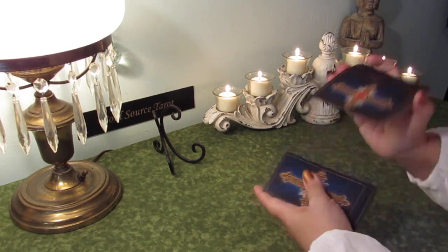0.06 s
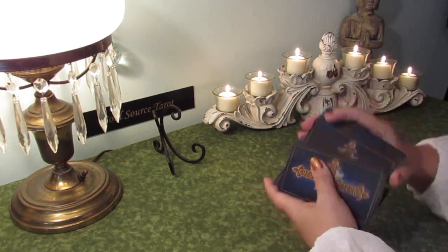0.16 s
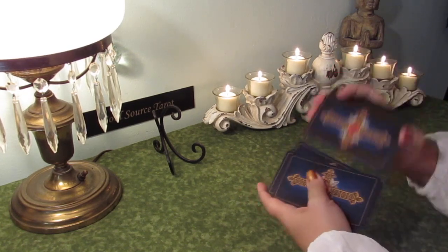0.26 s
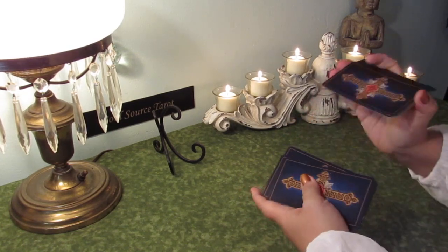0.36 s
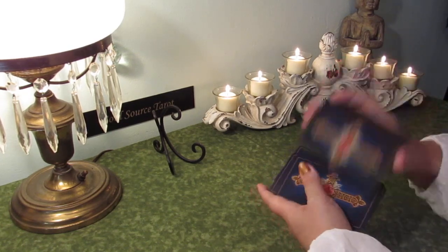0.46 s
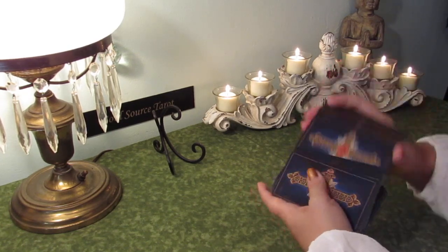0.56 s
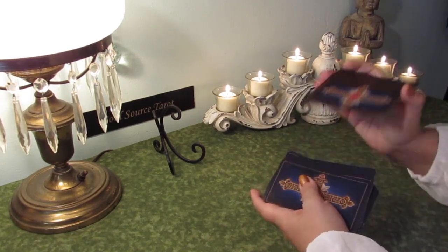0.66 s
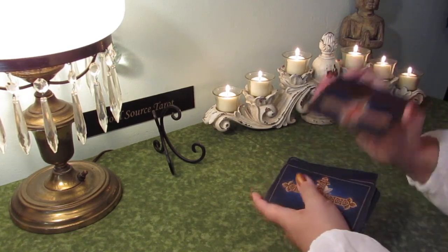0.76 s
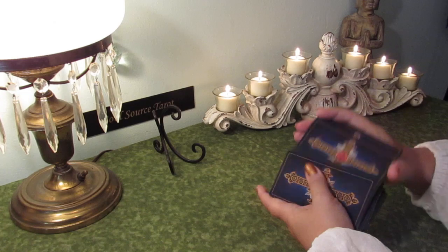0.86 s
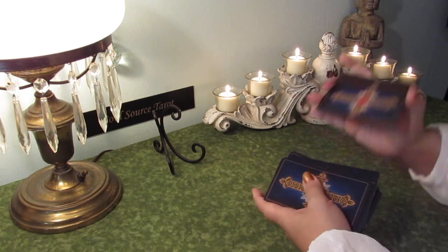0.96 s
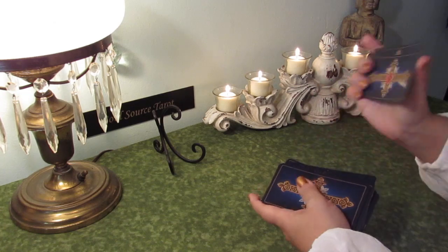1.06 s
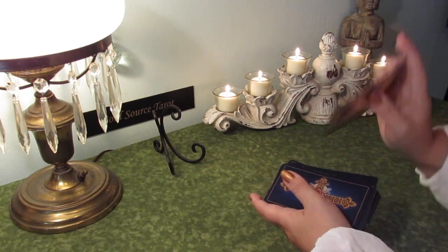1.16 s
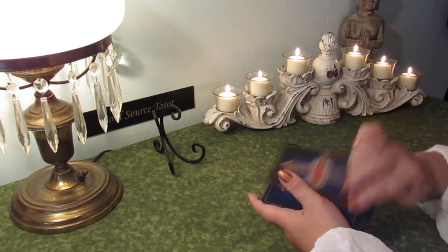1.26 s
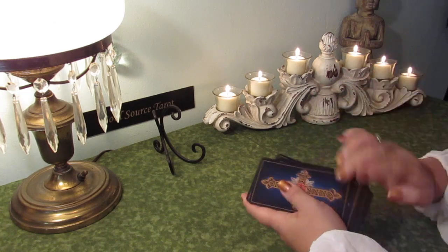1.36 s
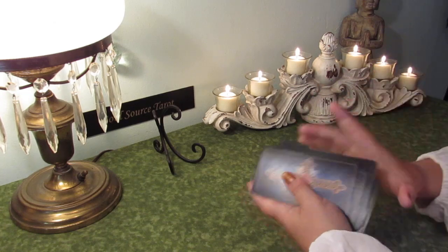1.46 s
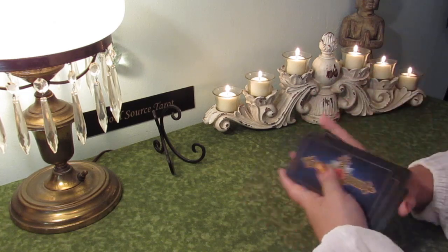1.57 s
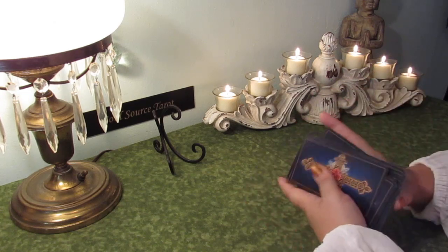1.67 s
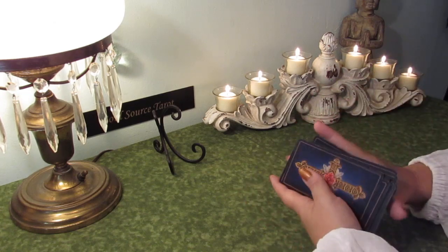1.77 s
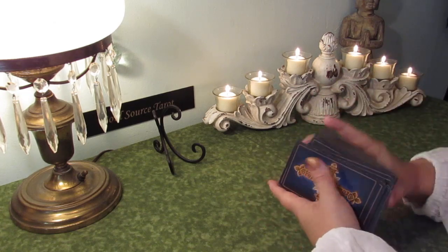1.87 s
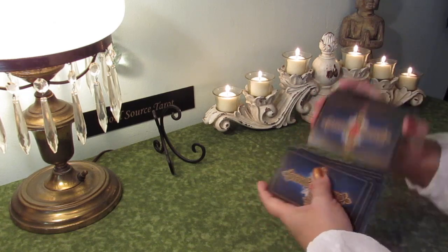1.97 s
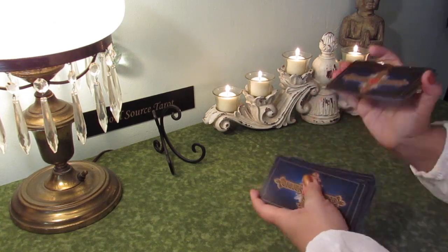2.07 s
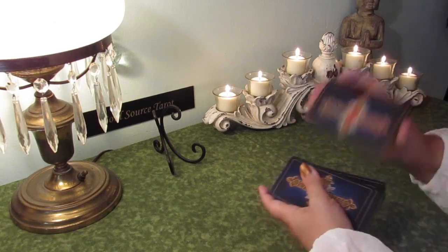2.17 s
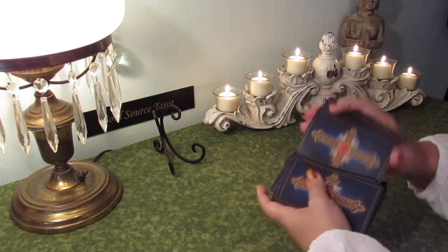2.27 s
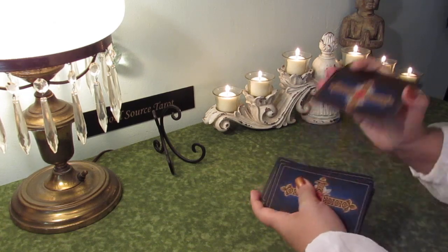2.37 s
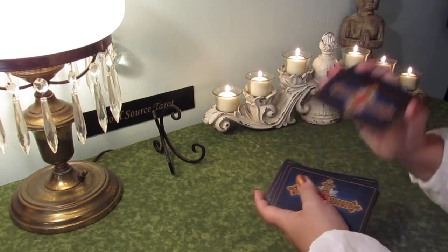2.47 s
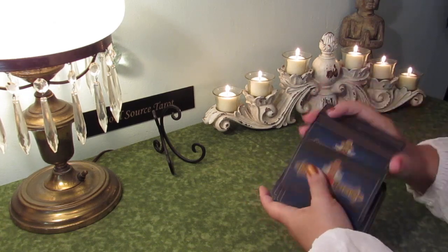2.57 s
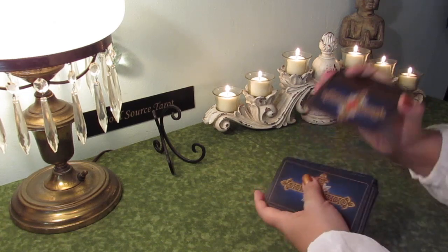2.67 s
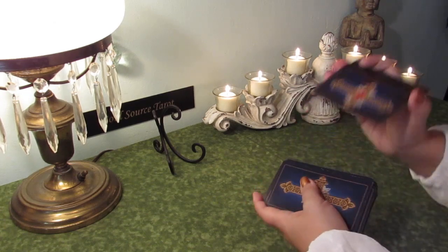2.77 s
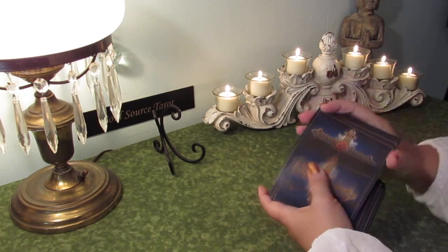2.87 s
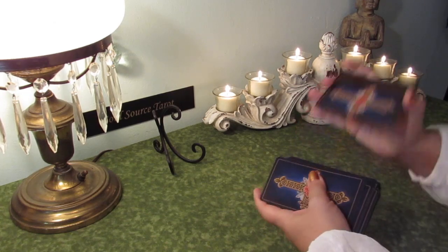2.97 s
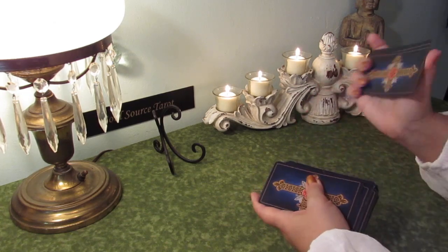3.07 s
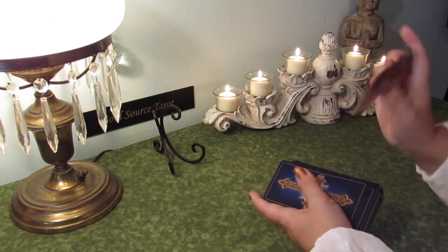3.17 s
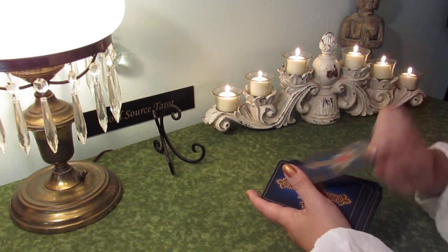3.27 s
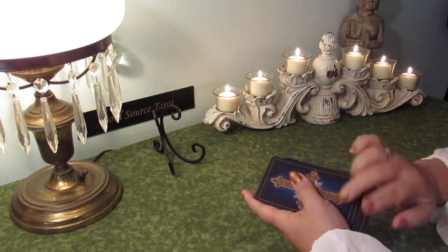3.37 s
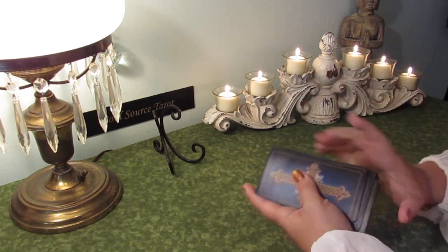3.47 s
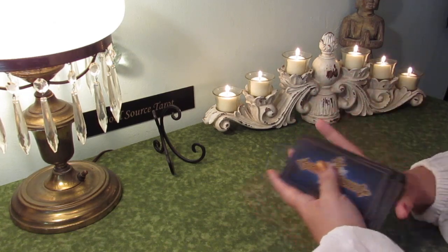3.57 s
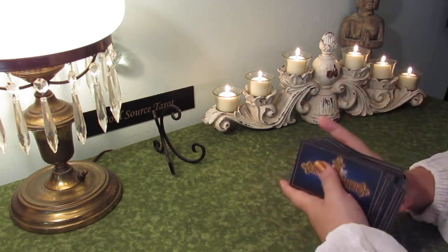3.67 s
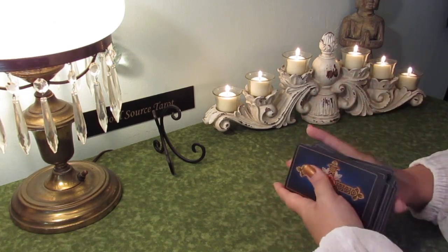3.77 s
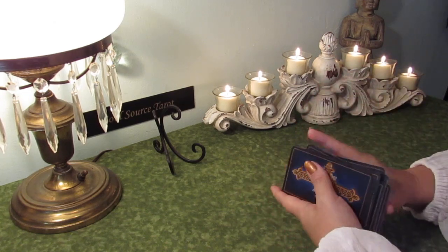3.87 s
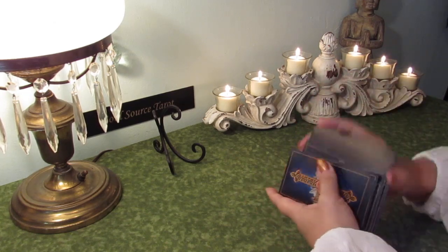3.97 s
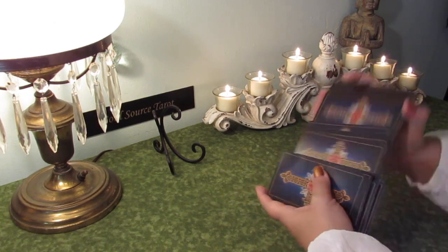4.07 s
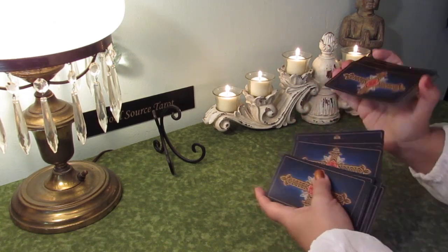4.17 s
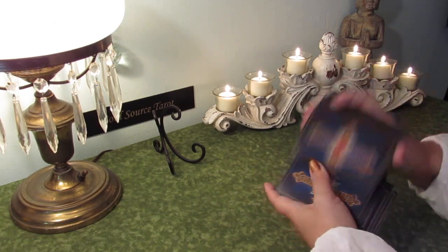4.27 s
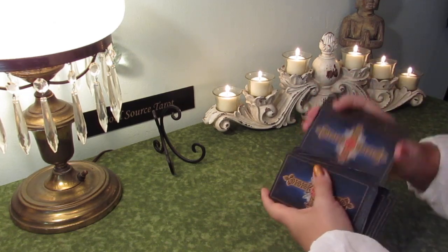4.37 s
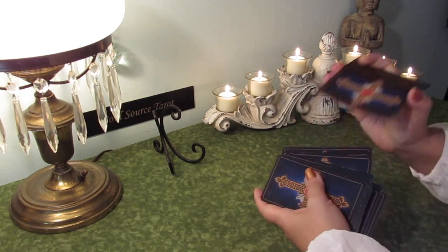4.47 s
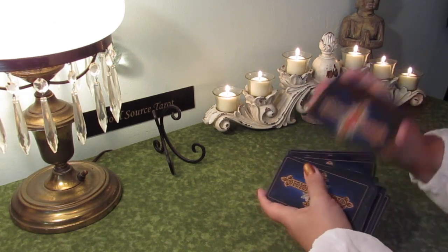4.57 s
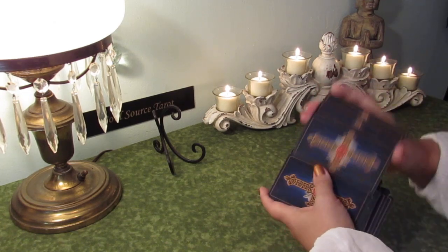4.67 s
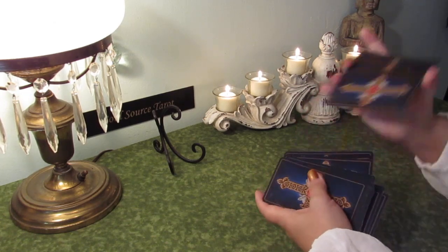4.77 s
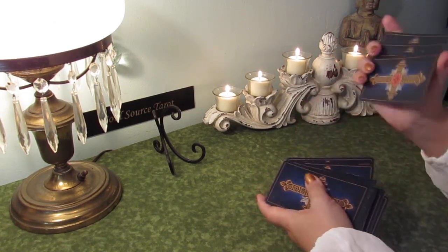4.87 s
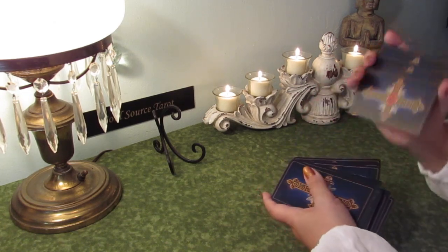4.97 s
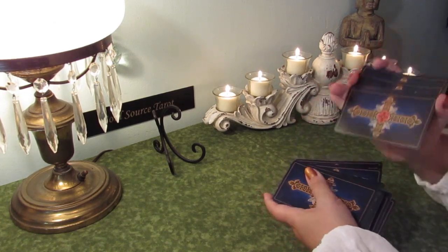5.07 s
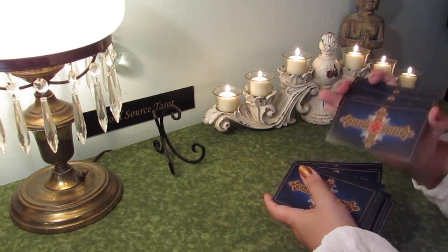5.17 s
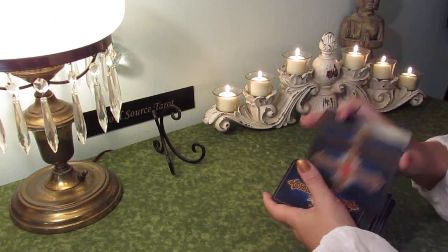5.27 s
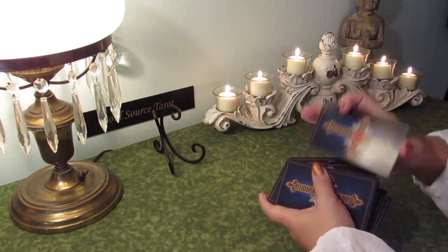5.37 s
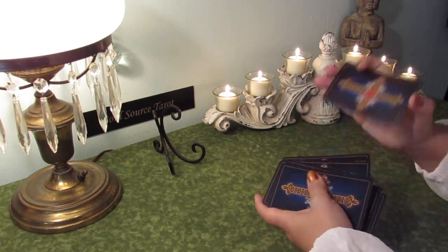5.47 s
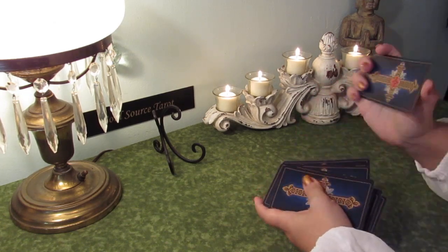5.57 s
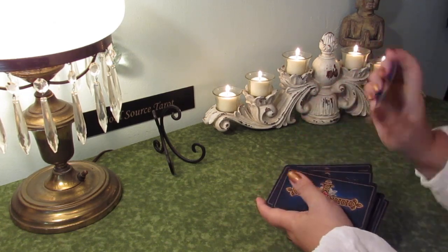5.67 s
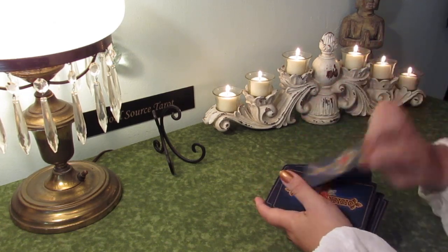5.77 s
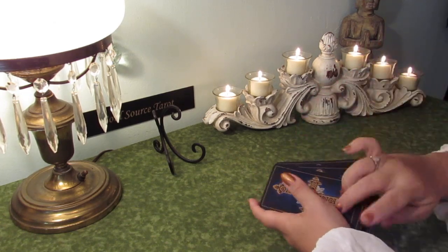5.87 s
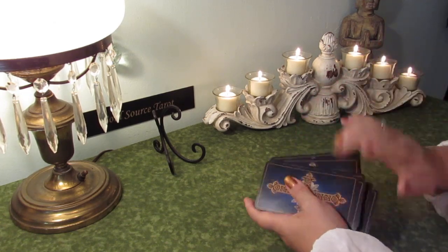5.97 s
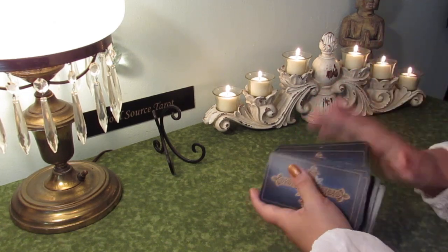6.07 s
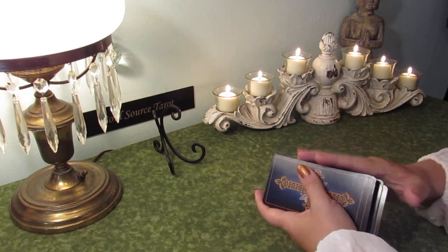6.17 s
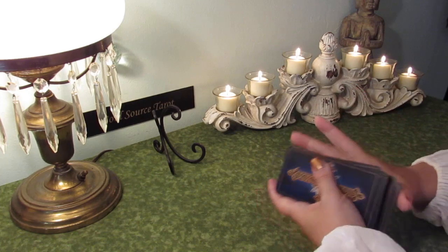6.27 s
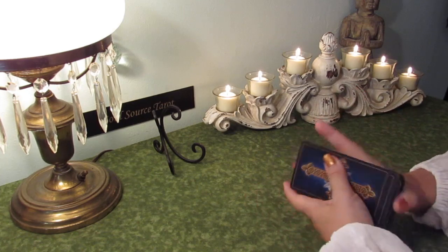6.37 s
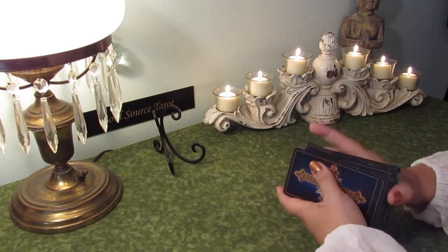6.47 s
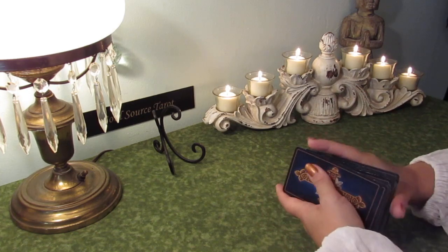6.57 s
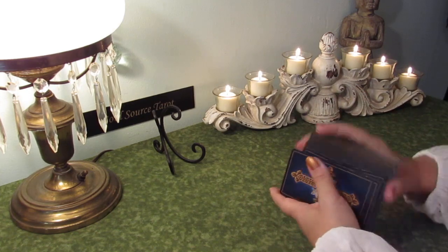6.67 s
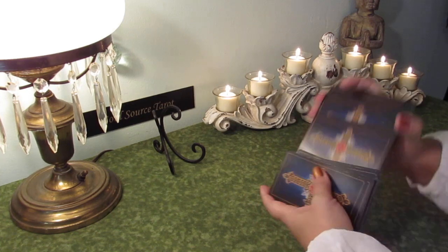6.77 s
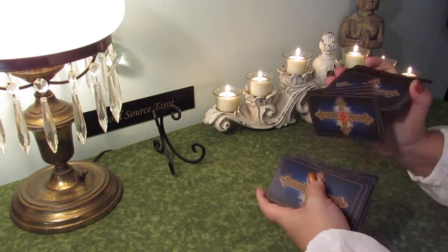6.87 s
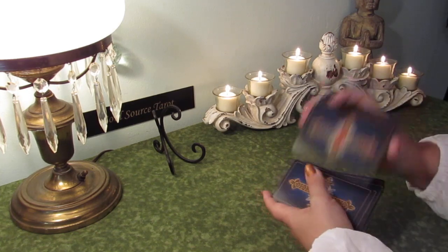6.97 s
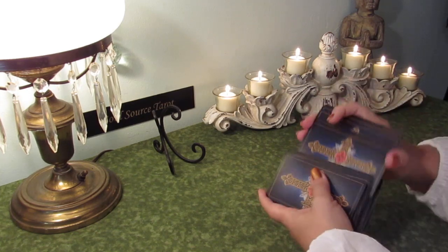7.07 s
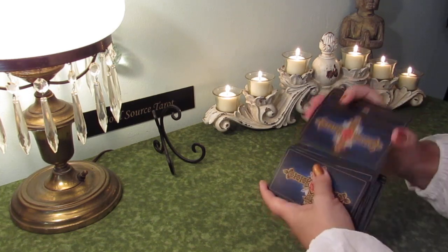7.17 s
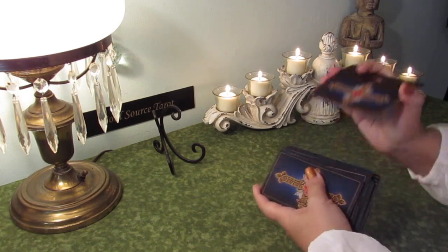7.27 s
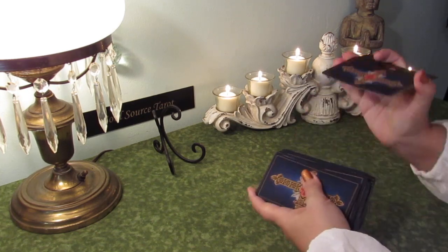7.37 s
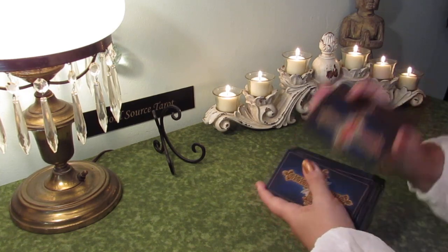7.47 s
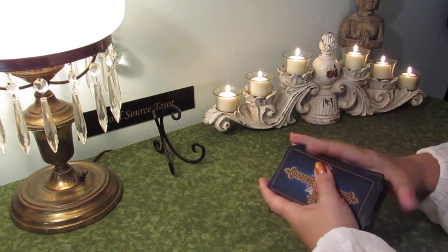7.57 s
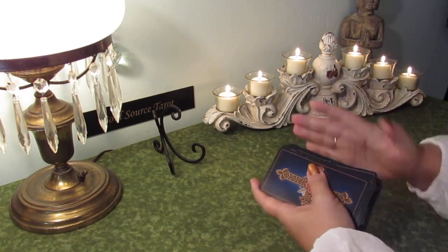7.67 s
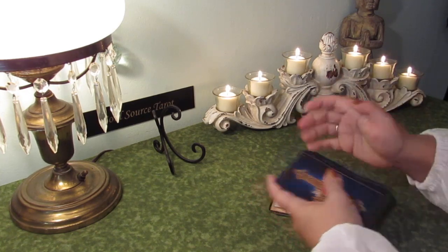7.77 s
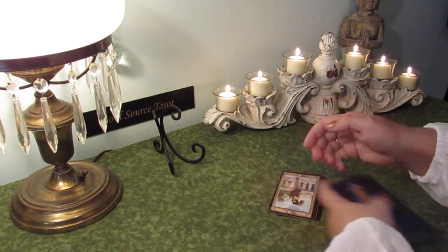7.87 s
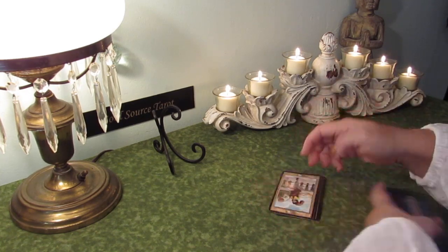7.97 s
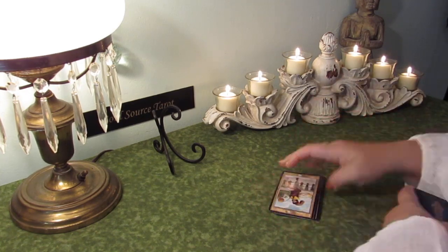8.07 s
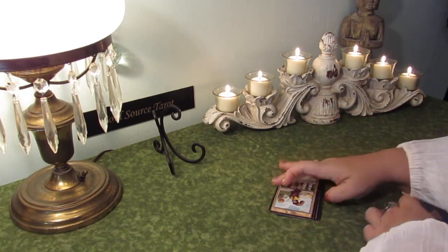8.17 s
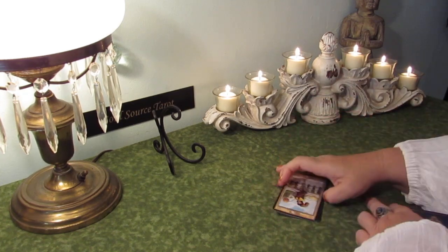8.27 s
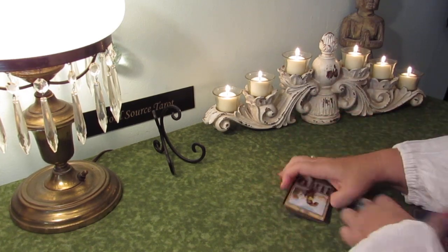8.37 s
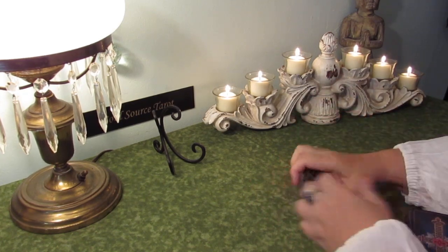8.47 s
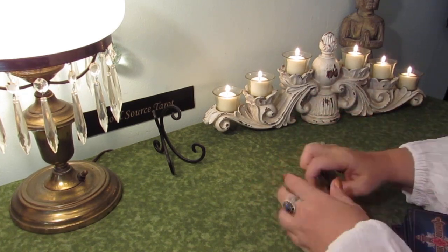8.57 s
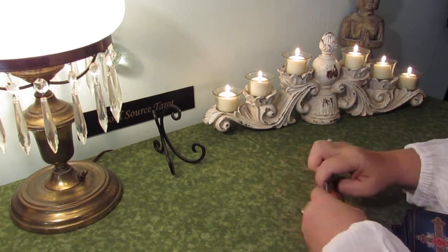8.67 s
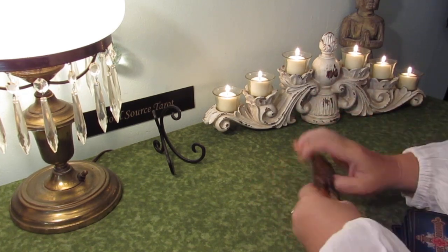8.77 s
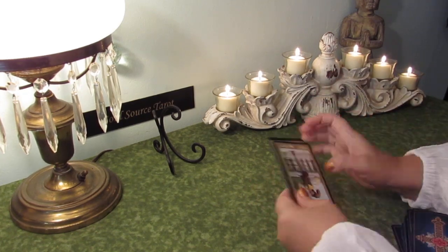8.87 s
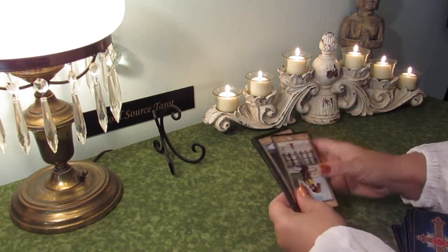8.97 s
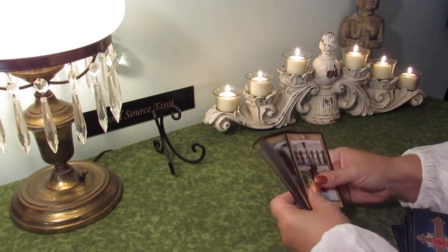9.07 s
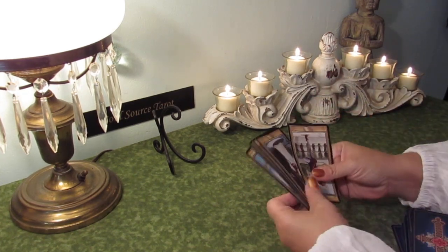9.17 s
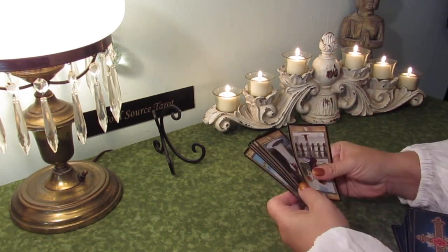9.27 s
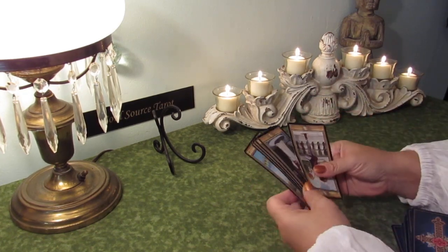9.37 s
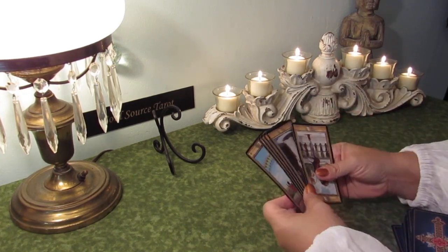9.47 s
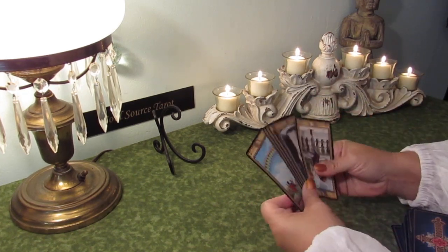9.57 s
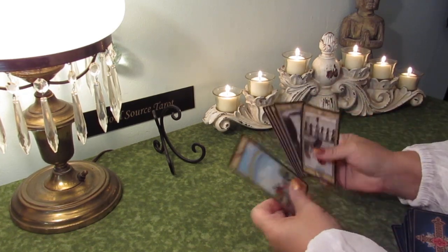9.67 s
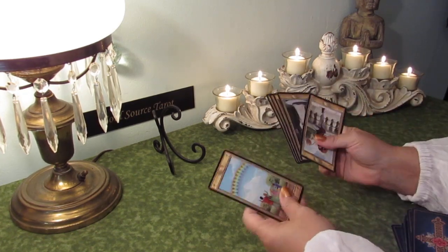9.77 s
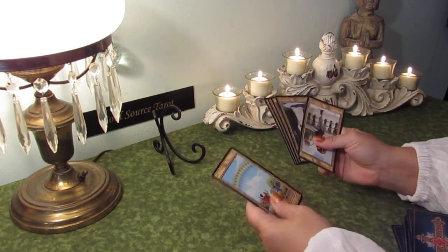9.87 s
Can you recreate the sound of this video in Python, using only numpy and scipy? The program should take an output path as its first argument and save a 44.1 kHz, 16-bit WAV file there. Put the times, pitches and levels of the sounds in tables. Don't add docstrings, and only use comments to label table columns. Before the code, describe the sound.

Irregular card snaps, clicks and short slides, faint birds outside, ending with a dull table thump and soft scuffling over cloth.

```python
import sys
import numpy as np
from scipy import signal
from scipy.fft import rfft, irfft, next_fast_len
from scipy.io import wavfile
from scipy.ndimage import map_coordinates

SR = 44100
rng = np.random.default_rng(int(sys.argv[2]) if len(sys.argv) > 2 else 0)


def nominal_scale(level):
    x = np.asarray(level, float) / 20
    return 10 ** x


def wav_out(sig):
    wavfile.write(sys.argv[1], SR, np.round(np.clip(np.atleast_2d(sig).T, -1, 1) * 32767).astype(np.int16))


N = 438353
SPAN = 16384
HZ = np.fft.rfftfreq(SPAN, 1 / SR)
TAILS = 16


def unit(x):
    return x / np.sqrt(np.mean(x ** 2) + 1e-20)


def along(points, hz):
    point_hz, value = np.transpose(points)
    return np.interp(np.log(hz + 1), np.log(point_hz + 1), value)


def causal(points):
    cepstrum = irfft(np.log(nominal_scale(along(points, HZ)) + 1e-6))
    cepstrum[1:SPAN // 2] *= 2
    return np.exp(rfft(cepstrum[:SPAN // 2], SPAN))


def resonance(hz, centre_hz, width_hz):
    return 1j * hz * width_hz / (centre_hz ** 2 - hz ** 2 + 1j * hz * width_hz)


def noise(gain):
    length = next_fast_len(N)
    spectrum = rfft(rng.standard_normal(length)) * gain(np.fft.rfftfreq(length, 1 / SR))
    return unit(irfft(spectrum, length)[:N])


def wobble(rate_hz):
    knots = rng.standard_normal(int(N * rate_hz / SR) + 4)
    return map_coordinates(knots, [np.arange(N) * rate_hz / SR])


def add(track, start_s, sound):
    start = round(start_s * SR)
    track[..., start:start + SPAN] += sound


# pitch_hz, level_db
NEAR_WIDTH = [(60, 8), (110, -19), (200, -23), (380, -20), (700, -14), (1290, -18), (2380, -25),
              (4400, -20), (8120, -7.5), (15000, -3.5)]
# pitch_hz, t60_s
ROOM_DECAY = [(150, 0.21), (500, 0.25), (2000, .2), (10000, 0.18)]
# delay_s, level_db
EARLY_ECHOES = [(.0007, -6), (.0024, -9), (.0066, -6), (.012, -10), (.016, -11)]


def rooms():
    sample = np.arange(SPAN)
    half = SPAN // 2
    hz, t, cells = signal.stft(rng.standard_normal((TAILS, 2, half)), SR, nperseg=256)
    decay = nominal_scale(-60 * t / along(ROOM_DECAY, hz)[:, None])
    tail = signal.istft(cells * decay, SR, nperseg=256)[1][..., :half]
    tail *= 1 - np.exp(-np.arange(half) / (0.00033 * SR))
    tail = rfft(tail / np.linalg.norm(tail[:, :1], axis=2, keepdims=True), SPAN)

    smear_s = 0.1 * np.array(EARLY_ECHOES)[:, :1]
    rough = rng.standard_normal((len(EARLY_ECHOES), SPAN)) * np.exp(-sample / (SR * smear_s))
    rough = rfft(rough / np.linalg.norm(rough, axis=1, keepdims=True))
    near = 1 / (1 + 1j * HZ / 6000)
    for (delay_s, level_db), smear in zip(EARLY_ECHOES, rough):
        near = near + nominal_scale(level_db) * smear * np.exp(-2j * np.pi * HZ * delay_s)

    microphone = (1j * HZ / (85 + 1j * HZ)) ** 2
    microphone *= 1 - 0.89 * resonance(HZ, 697, 240)
    microphone *= 1 + 0.18 * resonance(HZ, 1530, 133)
    side_gain = nominal_scale(along(NEAR_WIDTH, HZ) + 3.5)
    pickup = microphone * np.array([np.ones(len(HZ)), side_gain])
    return pickup * np.array([near, 0.66 + 0 * near]), pickup * tail


def in_room(x, near, tails, wet_db):
    out = np.zeros((2, N + 2 * SPAN))
    step = SPAN // 2
    for k, start in enumerate(range(0, N, step)):
        response = near + nominal_scale(wet_db) * tails[k % TAILS]
        add(out, start / SR, irfft(rfft(x[start:start + step], SPAN) * response))
    return out[:, :N]


# pitch_hz, level_db (per Hz)
FLOOR_MID_COLOUR = [(12, -58), (20, -20), (113, -2), (357, -8), (472, -6), (607, -5.5), (660, -27.5),
                    (718, -10.5), (849, -18), (1090, -14.5), (1400, -20), (2670, -24.5), (4810, -28.5),
                    (13500, -30.5), (16000, -41)]
# pitch_hz, level_db (per Hz)
FLOOR_SIDE_COLOUR = [(12, -59), (20, -46), (81, -1), (228, -3), (270, -4.5), (367, -7.5), (513, -10.5),
                     (718, -25.5), (897, -17.5), (1370, -24.5), (1530, -21.5), (1660, -33), (6720, -40.5),
                     (14700, -41), (16000, -69)]


def rumble_and_hiss():
    mid_level = nominal_scale(-55.5 + 0.33 * wobble(2.753))
    mid = mid_level * noise(lambda hz: nominal_scale(along(FLOOR_MID_COLOUR, hz)))
    side_level = nominal_scale(-47.5 + 1.0 * wobble(3.036))
    side = side_level * noise(lambda hz: nominal_scale(along(FLOOR_SIDE_COLOUR, hz)))
    return np.array([mid, side])


# middle_s, half_length_s, hiss_db
DRAW_STROKES = [(0.005, 0.019, -56.5), (0.583, 0.035, -41), (0.626, 0.019, -55), (1.15, 0.028, -57),
                (1.225, 0.057, -57), (1.702, 0.011, -59), (1.998, 0.082, -60), (2.679, 0.014, -46.5),
                (2.932, 0.0085, -36.5), (3.13, 0.025, -53), (3.21, 0.054, -60), (4.115, 0.037, -52.5),
                (4.88, 0.019, -51.5), (6.45, 0.02, -48.5), (6.763, 0.1, -63), (6.834, 0.03, -59),
                (6.881, 0.025, -49.5), (8.357, 0.027, -63), (9.6, 0.059, -64.5), (9.72, 0.062, -58.5),
                (9.91, 0.04, -63)]
# middle_s, half_length_s, hiss_db
SKID_STROKES = [(0.242, 0.013, -38), (0.319, 0.012, -43.5), (0.958, 0.06, -54), (2.326, 0.047, -50),
                (4.46, 0.019, -60), (5.385, 0.039, -55), (5.76, 0.016, -66), (5.897, 0.022, -50),
                (7.034, 0.025, -57), (7.14, 0.022, -46), (7.275, 0.011, -51), (7.61, 0.025, -43.5),
                (8.097, 0.025, -65), (8.155, 0.035, -64.5), (8.23, 0.031, -56), (8.475, 0.12, -63),
                (9.093, 0.026, -69)]
# middle_s, half_length_s, hiss_db
RUB_STROKES = [(0.293, 0.021, -57), (1.103, 0.045, -54), (1.325, 0.058, -48), (1.651, 0.018, -50),
               (2.64, 0.058, -53), (2.971, 0.013, -39.5), (3.327, 0.017, -46), (3.713, 0.1, -60),
               (4.17, 0.01, -63), (4.357, 0.027, -55.5), (4.401, 0.024, -43), (5.43, 0.038, -49.5),
               (5.628, 0.051, -60), (5.698, 0.013, -56), (5.766, 0.06, -57.5), (6.183, 0.018, -45.5),
               (6.978, 0.025, -58), (7.106, 0.045, -45), (7.212, 0.033, -59), (8.292, 0.04, -59),
               (8.64, 0.075, -61.5), (8.854, 0.031, -52), (9.18, 0.064, -56.5), (9.437, 0.061, -64.5),
               (9.51, 0.046, -58)]
# pitch_hz, level_db (per Hz)
HISS_COLOUR = [(590, -20), (1000, -25), (3050, -2.5), (3710, -5.5), (5700, -3), (10400, -3.5), (14600, -11),
               (15500, -13), (16000, -79)]


def slides():
    t = np.arange(N) / SR
    hiss, hollow = np.zeros(N), np.zeros(N)
    for strokes, ring_db in [(SKID_STROKES, 6), (RUB_STROKES, -5), (DRAW_STROKES, -17.5)]:
        for middle_s, half_s, hiss_db in strokes:
            span = slice(max(round((middle_s - half_s) * SR), 0), round((middle_s + half_s) * SR))
            stroke = nominal_scale(hiss_db - 8.5) * np.cos(np.pi / 2 * (t[span] - middle_s) / half_s)
            hiss[span] += stroke
            hollow[span] += nominal_scale(ring_db) * stroke
    grit = unit(nominal_scale(1.5 * wobble(90) + 4 * wobble(900)))
    gap = noise(lambda hz: resonance(hz, 1500, 1100) ** 2 + 0.45 * resonance(hz, 420, 300))
    friction = noise(lambda hz: nominal_scale(along(HISS_COLOUR, hz)))
    return grit * (hiss * friction + hollow * gap)


# start_s, length_s, from_hz, to_hz, level_db
TRILL_NOTES = [
    (.012, 0.016, 4900, 4800, -58),
    (.104, 0.015, 4980, 4700, -60),
    (.33, 0.11, 4160, 4140, -67.5),
    (.54, 0.019, 5640, 4300, -66),
    (.775, 0.037, 6300, 6960, -75),
    (9.84, .03, 4850, 4830, -69),
    (9.925, 0.034, 4860, 4800, -64),
]
# start_s, length_s, from_hz, to_hz, level_db
WHISTLE_NOTES = [
    (.06, 0.052, 6500, 7550, -73),
    (.52, 0.017, 5660, 5840, -62),
    (.575, 0.045, 5700, 5450, -73),
    (.74, 0.065, 5400, 6100, -73),
    (9.0, 0.082, 6220, 6400, -74),
    (9.09, 0.11, 8160, 7540, -71),
    (9.21, 0.17, 7880, 7680, -77),
]


def birds():
    out = np.zeros(N + SPAN)
    t = np.arange(SPAN) / SR
    for notes, warble_hz in [(TRILL_NOTES, 280), (WHISTLE_NOTES, 35)]:
        for start_s, length_s, from_hz, to_hz, level_db in notes:
            progress = np.clip(t / length_s, 0, 1)
            pitch_hz = from_hz + (to_hz - from_hz) * progress
            pitch_hz += warble_hz * np.sin(2 * np.pi * 290 * t)
            pitch_hz += 30 * wobble(300)[:SPAN]
            swell = np.sin(np.pi * progress) ** 0.38
            add(out, start_s, nominal_scale(level_db) * swell * np.sin(2 * np.pi * np.cumsum(pitch_hz) / SR))
    return out[:N]


# start_s, crack_db, hollow_hz, hollow_db, thud_db
SLAP_HITS = [(0.3038, -26.5, 1800, -12, -15), (0.3273, -29, 1560, -2, -16), (0.6872, -29.5, 940, -1, -17.5),
             (0.9088, -16, 1770, -2, -14), (0.9143, -10, 2770, -13, -25), (1.3506, -12, 1900, -12.5, -15.5),
             (2.0363, -30.5, 1490, -7.5, -18), (2.6166, -17.5, 1260, -13, -14.5),
             (2.708, -31, 1440, -10, -17), (2.9691, -27.5, 2380, -2, -14.5),
             (3.3646, -22.5, 880, -10.5, -16), (3.3825, -16, 1010, -12.5, -12.5),
             (4.6952, -22.5, 1610, -10, -15), (6.9496, -33.5, 1430, -10, -16),
             (7.0186, -28, 1470, -9.5, -18), (7.1271, -16.5, 2380, -6, -13), (7.2736, -34, 880, -3, 0),
             (7.5764, -5.5, 1780, -21, -18), (7.583, -17, 1490, -2, -15.5), (8.2611, -24, 1050, -15, -11),
             (9.761, -20, 1400, -12, -15)]
# start_s, ring_db, hollow_hz
TAP_HITS = [(0.3172, -38, 1470), (0.6955, -35.5, 1500), (1.6402, -41, 920), (1.7591, -37.5, 1440),
            (1.877, -48, 1150), (3.652, -51, 888), (4.466, -42, 1600), (4.8719, -40.5, 2500),
            (5.0498, -45, 1790), (5.8701, -36, 1750), (6.5259, -39.5, 1280), (6.8306, -51, 1490),
            (7.2631, -36, 2000), (8.079, -49, 1040), (8.2382, -39.5, 1000), (8.2874, -28, 1090),
            (8.8391, -39.5, 1740), (9.1225, -42, 1120)]
# start_s, crack_db
FLOP_HITS = [(0.5577, -26), (1.3567, -12.5), (3.326, -26), (4.1663, -36), (5.4086, -26), (5.463, -33),
             (5.9333, -31.5), (6.1642, -34.5), (6.4193, -37.5), (8.5769, -34), (9.0923, -47)]
# start_s, crack_db
TICK_HITS = [
    (1.0792, -34.5),
    (3.2578, -27.5),
    (5.328, -30.5),
    (6.2652, -23.5),
]
# start_s, crack_db, hollow_hz, hollow_db, thud_db
PAT_HITS = [(0.2214, -42, 2520, -13, -25), (0.2359, -36, 1630, 7, -8), (0.246, -29.5, 1450, -5, -22),
            (0.2579, -38, 1440, -8, -20), (1.3058, -46.5, 1980, 8, 7), (2.2882, -22, 2320, -11, -15),
            (2.2989, -24, 1860, -6, -18.5), (2.9257, -38, 1440, -9, -5.5), (3.787, -62.5, 1050, 16, -15),
            (4.3877, -30, 1450, 0.5, -27), (4.3905, -38, 1456, 14, -9), (5.845, -38, 1500, 11, -6.5),
            (5.8490, -41, 1750, 12, -8), (6.5535, -55, 1050, 3, -8), (7.0558, -34.5, 1490, 7.5, -9),
            (7.0626, -26, 950, -5.5, -8), (7.0727, -29.5, 1400, 0, -9), (8.482, -46.5, 2710, 9, -3),
            (8.4914, -52, 2900, 8, -3), (8.762, -41.5, 1050, -10, -9)]


def contacts():
    tap_ring_db = 3.5
    flat = (1700, -39)
    hits = [(s, db, thud, hz, ring, 0.000606) for s, db, hz, ring, thud in SLAP_HITS]
    hits += [(s, db - tap_ring_db, -10.5, hz, tap_ring_db, 0.0006) for s, db, hz in TAP_HITS]
    hits += [(s, db, -15.5, *flat, 0.00075) for s, db in FLOP_HITS]
    hits += [(s, db, -42, *flat, 0.000574) for s, db in TICK_HITS]
    hits += [(s, db, thud, hz, ring, 0.0027) for s, db, hz, ring, thud in PAT_HITS]
    return hits


# pitch_hz, level_db (per Hz)
CRACK_COLOUR = [(290, -1), (500, -7.5), (708, 2.5), (1480, -0.5), (2100, 3), (8580, -2.5), (14200, -11),
                (15300, -18), (16000, -72)]


def slaps(near, tails):
    out = np.zeros((2, N + SPAN))
    t = np.arange(SPAN) / SR
    card = causal(CRACK_COLOUR)
    deck = resonance(HZ, 282, 534) ** 2 + 0.31 * resonance(HZ, 173, 190)

    def gap(hz, damping):
        return resonance(HZ, hz, damping * hz) ** 2

    for k, (start_s, crack_db, thud_db, hollow_hz, hollow_db, contact_s) in enumerate(contacts()):
        contact_s = np.clip(contact_s, 2e-4, 0.012)
        rattle = rng.standard_normal(SPAN) * t / contact_s * np.exp(-t / contact_s)
        rattle = rattle / np.linalg.norm(rattle)
        sharpness = np.clip(0.0008 / contact_s, 0, 1)
        push = rfft(0.75 * rattle - sharpness * (t == 0))

        def peak(colour):
            return colour / np.abs(irfft(colour * push)).max()

        damping = 0.45 if contact_s < 0.0013 else 0.2
        crack = peak(card)
        ring = gap(hollow_hz, damping) - 0.11 * gap(1.81 * hollow_hz, damping)
        hollow = nominal_scale(hollow_db - 1.5) * peak(ring)
        thud = nominal_scale(thud_db + 4.5) * peak(deck)
        direct = (crack + hollow - thud) * push * near
        late = np.exp(-2j * np.pi * HZ * contact_s) * np.sqrt(np.mean(np.abs(push) ** 2))
        diffuse = nominal_scale(1.5) * crack + nominal_scale(-10.0) * hollow - nominal_scale(2.5) * thud
        wet = diffuse * late * tails[k % TAILS]
        add(out, start_s + 0.000962, nominal_scale(crack_db + 1.5) * irfft(direct + wet))
    return out[:, :N]


# pitch_hz, level_db, t60_s
TABLE_MODES = [(118, -4, 0.033), (156, 0.5, 0.049), (224, -1.5, 0.16), (280.6, -0.5, 0.18), (360, 2, 0.079),
               (470, -1.5, 0.027), (548, -19, 0.06), (940, -21, 0.034), (1100, -10, 0.034),
               (1400, -3, 0.022), (1750, -16, 0.025)]


def table(hz, scatter_db):
    response = 0.26 * resonance(hz, 750, 1800)
    for k, (mode_hz, level_db, t60_s) in enumerate(TABLE_MODES):
        width_hz = np.log(1000) / np.pi / min(t60_s, 0.14)
        strength = nominal_scale(level_db + scatter_db * rng.standard_normal())
        response = response + (-1) ** k * strength * resonance(hz, mode_hz, width_hz)
    return response


# start_s, peak_db, contact_s
TABLE_BLOWS = [
    (7.116, -26, 0.00063),
    (7.277, -25.5, 0.0014),
    (8.204, -20, 0.00025),
    (8.216, -39, 0.00065),
    (8.279, -14, 0.001),
    (8.287, -19, 0.00078),
    (8.328, -30, 0.0005),
    (8.404, -39, 0.0007),
    (8.759, -34, 0.00092),
]


def thumps(near, tails):
    out = np.zeros((2, N + SPAN))
    t = np.arange(SPAN) / SR
    for k, (start_s, peak_db, contact_s) in enumerate(TABLE_BLOWS):
        contact_s = np.clip(contact_s, 1e-4, 0.004)
        blow = rfft(t * np.exp(-t / contact_s))
        ring = blow * table(HZ, scatter_db=3)
        ring = ring / np.abs(irfft(ring)).max()
        add(out, start_s, nominal_scale(peak_db - 1.5) * irfft(ring * (near + nominal_scale(-1.0) * tails[k])))
    return out[:, :N]


# start_s, level_db
CLOTH_SHOVES = [
    (8.3, -37),
    (8.37, -37),
    (8.42, -48),
    (8.58, -43),
    (8.62, -39.5),
    (8.685, -39.5),
    (8.71, -46.5),
    (8.78, -43),
    (8.842, -48),
]


def drag():
    start_s, level_db = np.transpose(CLOTH_SHOVES)
    since_s = np.clip(np.arange(N) / SR - start_s[:, None], 0, 1)
    rise = 1 - np.exp(-since_s / 0.008)
    fall = nominal_scale(-60 * since_s / 0.26)
    shoves = nominal_scale(level_db) @ (rise * fall)
    jerks_db = 3 * wobble(50)
    scuffle = noise(lambda hz: resonance(hz, 270, 460) ** 2 + 0.078 * resonance(hz, 630, 890))
    return shoves * nominal_scale(jerks_db - 11.5) * scuffle


def scene():
    room = rooms()
    running = in_room(slides() + drag() + birds(), *room, wet_db=6.5)
    mid, side = slaps(*room) + thumps(*room) + running + rumble_and_hiss()
    return np.array([mid + side, mid - side]) * nominal_scale([[-0.5], [0.4]])


def low_pass(x):
    return signal.sosfilt(signal.butter(12, 15150, fs=SR, output="sos"), x)


def record(dry):
    top_hz = 15150
    kept = irfft(rfft(dry) * (np.fft.rfftfreq(N, 1 / SR) < top_hz), N)
    return low_pass(kept)


dry = scene()
out = record(dry)
wav_out(out)
```